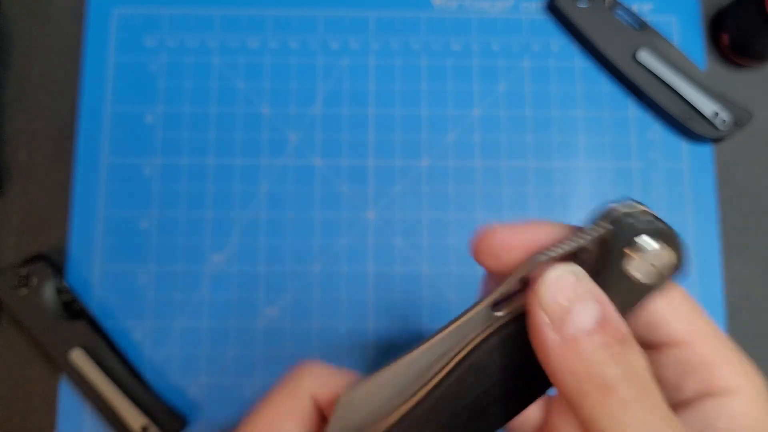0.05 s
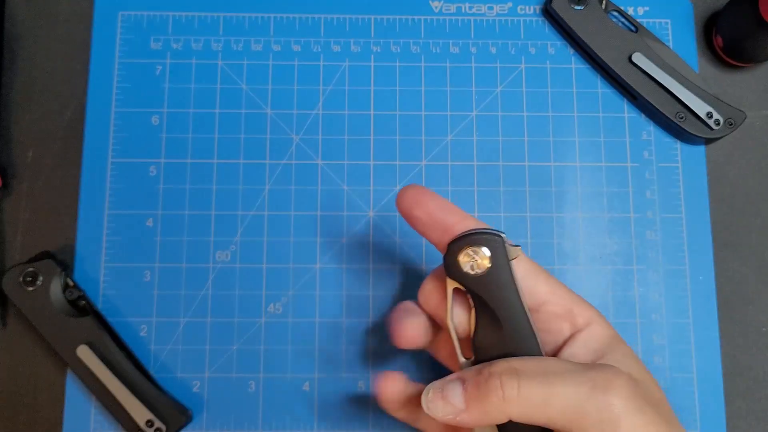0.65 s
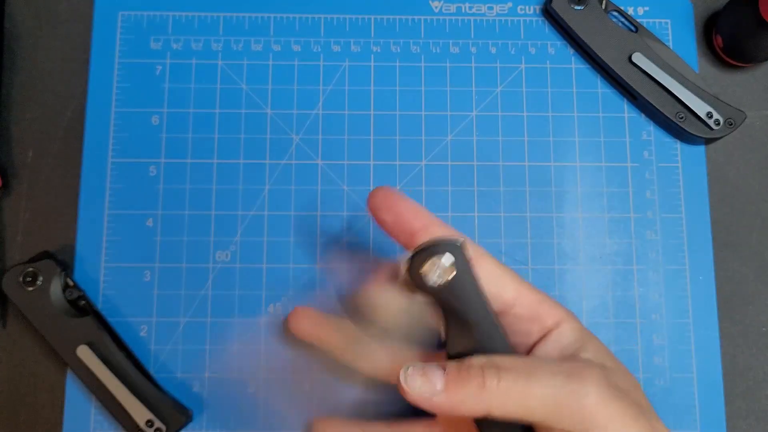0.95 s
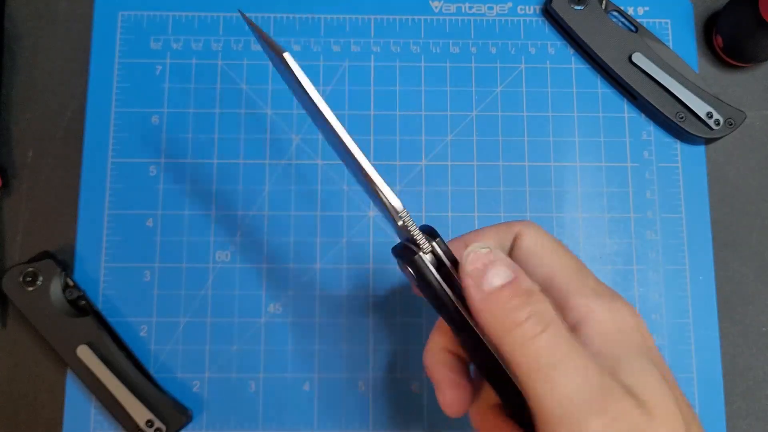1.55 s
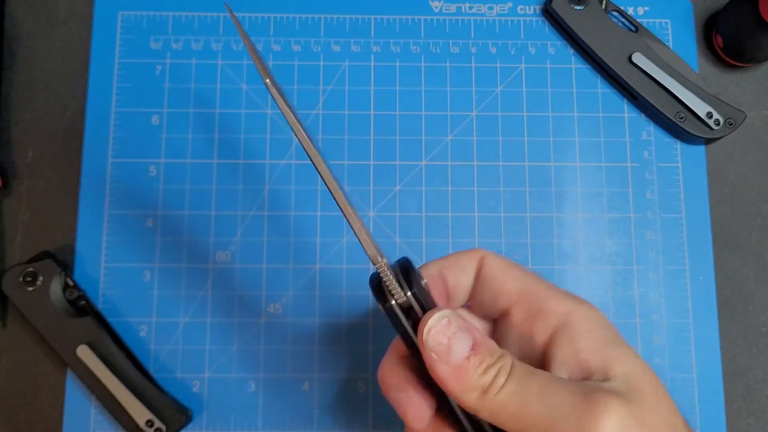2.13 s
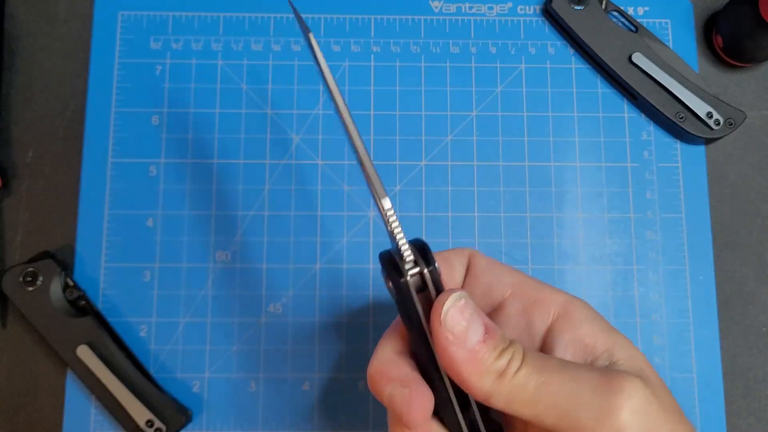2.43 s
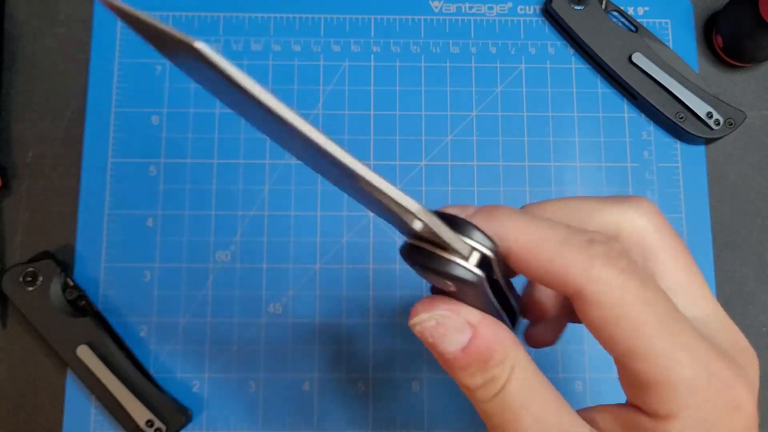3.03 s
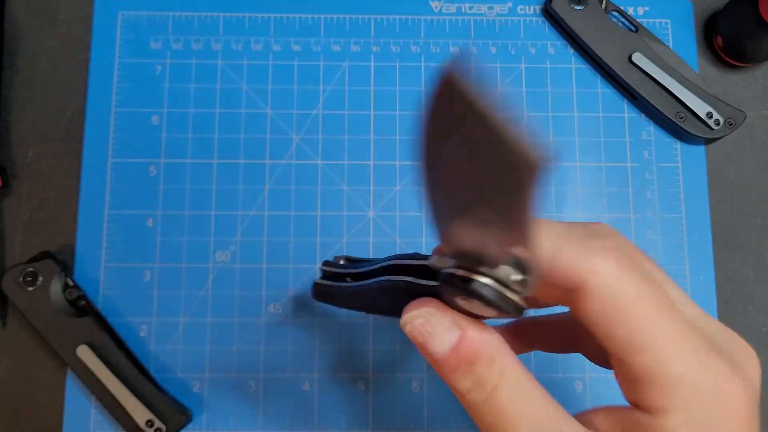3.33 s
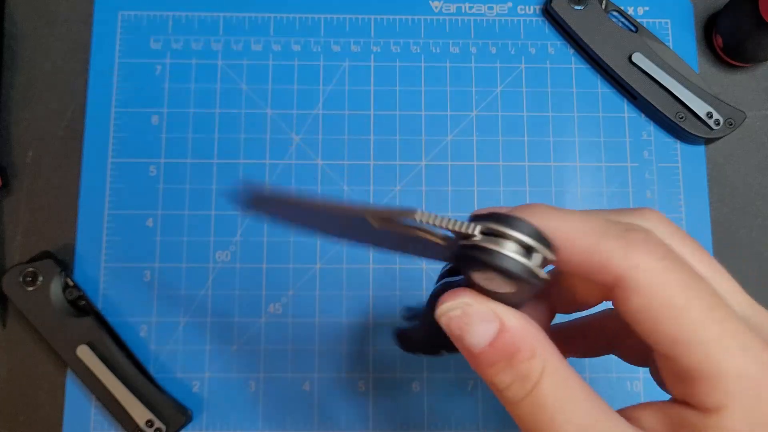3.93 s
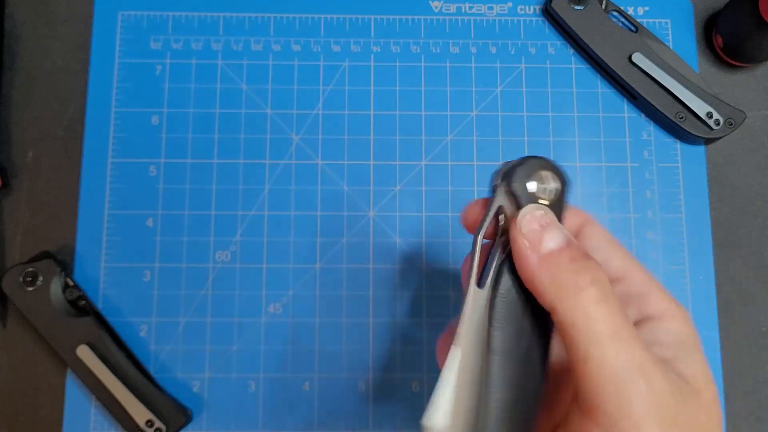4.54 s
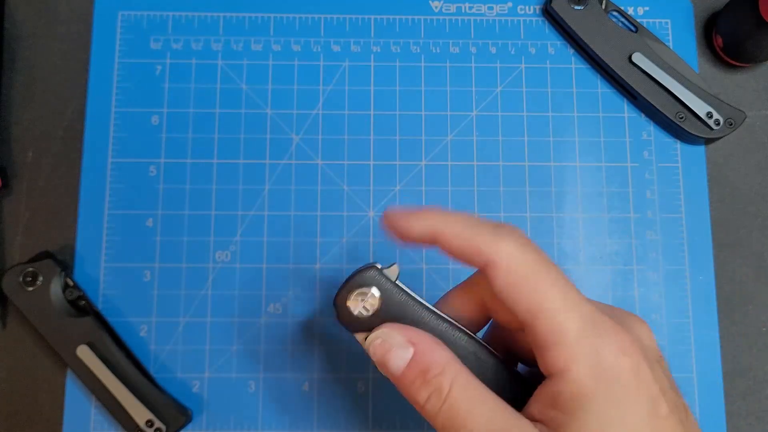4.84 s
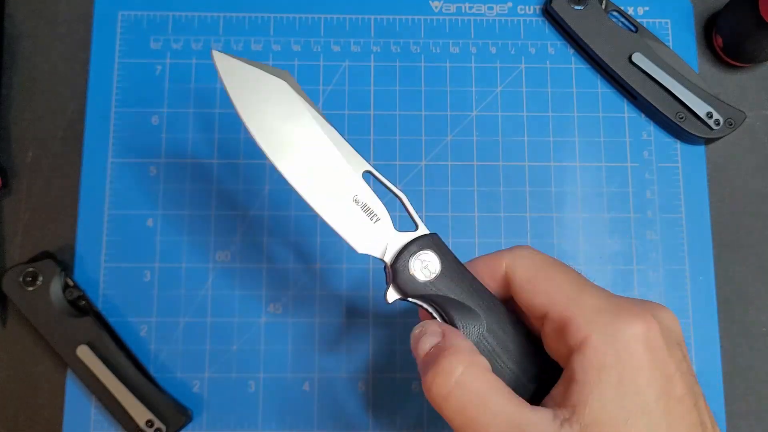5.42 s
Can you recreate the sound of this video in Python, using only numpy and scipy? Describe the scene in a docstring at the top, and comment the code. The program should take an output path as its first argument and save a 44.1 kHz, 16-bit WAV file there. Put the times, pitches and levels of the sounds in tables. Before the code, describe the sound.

A folding knife snaps open loudly, clicks and drops shut, then snaps open again over a faint fan hum.

```python
"""Fingers rub and squeak on a folding knife's handle, close up, over a fan in a small room.
The blade is flicked open, the lock thumbed aside, the blade drops shut and is flicked open again.
Each steel contact is a burst of chatter that sets the blade ringing; the handle knocks dully.
The two loud opening snaps each hold the gain down for a second."""
import sys
import numpy as np
from scipy import signal
from scipy.fft import rfft, irfft, next_fast_len
from scipy.io import wavfile
from scipy.ndimage import uniform_filter1d, minimum_filter1d

SR = 44100
rng = np.random.default_rng(int(sys.argv[2]) if len(sys.argv) > 2 else 0)


def store_pcm(level_fs):
    """Save levels as 16-bit WAV."""
    pcm = np.round(np.clip(level_fs, -1, 1) * 32767).astype(np.int16)
    wavfile.write(sys.argv[1], SR, np.atleast_2d(pcm).T)


N = 250293
N_FFT = next_fast_len(N, real=True)
TIME_S, FREQS_HZ = np.arange(N) / SR, np.fft.rfftfreq(N_FFT, 1 / SR)
CUTOFF_HZ = 16000


def from_db(db):
    """Decibels to gain."""
    return 10 ** (np.asarray(db) / 20)


def unit_rms(x):
    """Scale to rms 1."""
    return x / np.sqrt(np.mean(x ** 2) + 1e-30)


def at_hz(points, hz):
    """Interpolate a table over log frequency."""
    f, value = np.transpose(points)
    return np.interp(np.log(np.maximum(hz, 1)), np.log(f), value)


def panned(pan_db):
    """Stereo gains; pan is left minus right."""
    return from_db(np.array([[.5], [-.5]]) * pan_db)


def noise(colour):
    """Coloured noise, independent per channel, rms 1."""
    white = rfft(rng.standard_normal((2, N_FFT)))
    return unit_rms(irfft(white * from_db(at_hz(colour, FREQS_HZ)), N_FFT)[:, :N])


def jitter(samples):
    """Moving average of white noise, rms 1."""
    return unit_rms(uniform_filter1d(rng.standard_normal(N), size=samples))


def coloured(x, colour, taps=2048):
    """Minimum-phase filter of unit power."""
    hz = np.fft.rfftfreq(taps, 1 / SR)
    gain = from_db(at_hz(colour, hz)) / (1 + (hz / CUTOFF_HZ) ** 20)
    gain = gain * (hz + 1) / (hz + colour[0][0])   # a small body radiates little bass
    cepstrum = irfft(np.log(unit_rms(gain)))
    cepstrum[1:taps // 2] *= 2
    cepstrum[taps // 2 + 1:] = 0
    impulse = irfft(np.exp(rfft(cepstrum)))
    return signal.fftconvolve(x, impulse[None], axes=1)[:, :x.shape[1]]


def envelope(start_s, rise_s, hold_s, fall_s):
    """A movement speeds up, holds and slows to rest."""
    rise = np.clip((TIME_S - start_s) / rise_s, 0, 1)
    fall = np.clip((TIME_S - start_s - rise_s - hold_s) / fall_s, 0, 1)
    return np.sin(np.pi / 2 * rise) ** 2 * np.cos(np.pi / 2 * fall)


def add(out, sound, start_s):
    """Mix a sound in place."""
    start = int(round(start_s * SR))
    out[:, start:start + sound.shape[1]] += sound[:, :N - start]


# fan spectrum, low and high parts: f/Hz, relative level/dB
RUMBLE_COLOUR = [(20, -22), (40, -14.5), (57, 0.97), (75, -11.5), (97, -14), (138, 2.48), (180, -5),
                 (240, 2.97), (380, -4), (490, -2), (750, -10.5), (1300, -11.5), (2050, -20), (2450, -27)]
HISS_COLOUR = [(2450, -23.5), (3300, -35), (3850, -28), (4250, -23), (4750, -31), (7000, -34), (8500, -41),
               (15500, -42)]
# fan balance: f/Hz, pan/dB
FAN_PAN = [(50, -9), (130, -0.5), (250, -4), (1000, -4), (2200, -9), (3200, -9.5), (4300, -8),
           (7000, -12.5), (9000, -0.5), (16000, -0.5)]
# power common to both channels: f/Hz, share/0-1
FAN_COHERENCE = [(50, 0.99), (220, 0.91), (400, 0.49), (700, 0.56), (1200, 0.58), (1800, .35), (3000, 0.23),
                 (16000, 0.067)]
# motor tones: f/Hz, level/dB
MOTOR_WHINE = [(2003, -81.5), (2105, -83), (4107, -86), (4269, -84.5)]


def fan(rush_db=-55, lag_s=.00046, boom_hz=330, whine_pan_db=-6):
    """A fan on the right: its rush reaches the left late, while the room's boom stays in phase."""
    common = rfft(rng.standard_normal(N_FFT))
    separate = rfft(rng.standard_normal((2, N_FFT)))
    share = np.clip(at_hz(FAN_COHERENCE, FREQS_HZ), 0, 1)
    delay_s = np.array([[1], [0]]) * lag_s * np.clip(FREQS_HZ / boom_hz / 2 - .5, 0, 1)
    delayed = common * np.exp(-2j * np.pi * FREQS_HZ * delay_s)
    spectrum = np.sqrt(share) * delayed + np.sqrt(1 - share) * separate
    spectrum *= from_db(at_hz([*RUMBLE_COLOUR, *HISS_COLOUR], FREQS_HZ))
    spectrum *= panned(at_hz(FAN_PAN, FREQS_HZ))
    rush = unit_rms(irfft(spectrum, N_FFT)[:, :N])
    whine = sum(from_db(db) * np.sqrt(2) * np.sin(2 * np.pi * hz * TIME_S) for hz, db in MOTOR_WHINE)
    return from_db(rush_db) * rush + whine * panned(whine_pan_db)


# room decay: f/Hz, t60/s
TAIL_DECAY = [(300, .24), (1500, 0.19), (4000, .205), (6500, 0.23), (10000, .19), (16000, 0.15)]
# room spectrum: f/Hz, relative level/dB
TAIL_COLOUR = [(300, -4.5), (1500, 1.5), (4000, 0), (6500, 0), (10000, 4), (16000, 3.5)]


def room(x, onset_s=.003, build_s=.0038, late_db=-29.5, late_t60_s=.56, echo_db=-13):
    """Desk and walls return a dense tail; the far end of the room adds a faint, slower one."""
    t = np.arange(SR // 2) / SR
    hz = np.fft.rfftfreq(len(t), 1 / SR)
    spectrum = rfft(rng.standard_normal((2, len(t)))) * from_db(at_hz(TAIL_COLOUR, hz))
    late = from_db(late_db - 60 * t / late_t60_s)
    centres_hz, t60s_s = np.transpose(TAIL_DECAY)
    tail = 0
    for t60_s, weights in zip(t60s_s, np.eye(len(t60s_s))):
        band = at_hz(list(zip(centres_hz, weights)), hz)
        tail += irfft(spectrum * band, len(t)) * (from_db(-60 * t / t60_s) + late)
    tail *= np.clip((t - onset_s) / build_s, 0, 1)
    tail /= np.sqrt(np.sum(tail ** 2) / 2)
    for channel, echo_s in enumerate([.0115, .0088]):   # one wall echo a side
        tail[channel, int(echo_s * SR)] += from_db(echo_db)
    return signal.fftconvolve(x, tail, axes=1)[:, :N]


def friction(colour, grain_db, waver_db):
    """Sliding hiss: tiny catches under a wavering pressure."""
    catches, pressure = jitter(60), jitter(700)
    return noise(colour) * unit_rms(from_db(grain_db * catches + waver_db * pressure))


# finger strokes: t/s, rise/s, fall/s, level/dB
STROKES = [(0, 0.0033, 0.36, -61), (.305, 0.041, 0.092, -71), (0.444, 0.006, .08, -60), (.5, .03, .17, -77),
           (1.25, .04, .08, -67.5), (2.78, .08, .07, -79), (3.93, .045, .15, -73), (4.57, .075, .07, -74)]
# skin on the handle: f/Hz, relative level/dB
SKIN_COLOUR = [(1500, -2.5), (3000, -1), (5500, 3.5), (8000, -2), (12000, 0), (16000, 1)]


def fingers():
    """Fingers rub the handle as the grip shifts; the level follows their speed."""
    strokes = sum(from_db(db) * envelope(t_s, rise_s, 0, fall_s) for t_s, rise_s, fall_s, db in STROKES)
    return strokes * friction(SKIN_COLOUR, grain_db=2, waver_db=-2.1)


# skin squeaks: t/s, length/s, start f/Hz, glide/(Hz/s), level/dB
SKIN_SQUEAKS = [(0, 0.076, 13450, -9000, -71), (0.067, .12, 12600, -11000, -74),
                (.13, 0.073, 9560, -11000, -73), (0.136, 0.066, 7170, 9000, -68),
                (.32, .06, 14700, 10000, -74)]


def squeak(t_s, length_s, start_hz, glide_hz_per_s, db, waver_hz=90):
    """Skin sticks and slips on the handle: a thin, unsteady, gliding tone."""
    hz = start_hz + glide_hz_per_s * np.clip(TIME_S - t_s, 0, length_s) + waver_hz * jitter(60)
    swell = envelope(t_s, length_s / 2, 0, length_s / 2)
    return from_db(db) * swell * np.sin(2 * np.pi * np.cumsum(hz) / SR)


# pivot friction: f/Hz, relative level/dB
PIVOT_COLOUR = [(1500, -17), (3000, -10), (4800, 1), (7500, -9), (12500, -9.5), (16000, -7)]


def pivot(flicks, spin_up_s=.048, stop_s=.003):
    """The blade spins up on its pivot and coasts until the slam stops it."""
    swings = sum(from_db(db) * envelope(slam_s - swing_s, spin_up_s, swing_s - spin_up_s, stop_s)
                 for slam_s, *_, swing_s, db in flicks)
    return swings * friction(PIVOT_COLOUR, grain_db=-1.1, waver_db=-2.5)


# air on the microphone: f/Hz, relative level/dB
AIR_COLOUR = [(20, -9.5), (55, 6), (110, -5), (220, -10.5), (500, -20)]


def air_puff(t_s, left_db=-24.5, right_db=-42.5):
    """Air pushed by the swing reaches the microphone as the blade stops."""
    gust = envelope(t_s, rise_s=.0023, hold_s=.015, fall_s=.009)
    return from_db([[left_db], [right_db]]) * gust * noise(AIR_COLOUR)


# handle and lock bar knocks, and one room boom: t/s, f/Hz, level/dB, t60/s
KNOCKS_AND_BOOM = [(1.0054, 1350, -41, 0.092), (1.038, 302, -33, 0.071), (1.052, 136.1, -33.5, 0.2),
                   (2.3274, 3490, -50, 0.027), (2.3263, 5200, -50.5, .018), (4.1045, 620, -46, .02),
                   (4.1062, 1690, -44, 0.041), (4.1056, 4880, -48, .03), (5.1836, 1500, -29, 0.034)]


def knocks_and_boom():
    """Short, hand-damped knocks of handle and lock bar, and a low room boom after the first snap."""
    out, t = np.zeros((2, N)), np.arange(SR // 4) / SR
    for t_s, hz, db, t60_s in KNOCKS_AND_BOOM:
        mode = from_db(db - 60 * t / t60_s) * np.sin(2 * np.pi * hz * t)
        add(out, mode[None], t_s)
    return out


# steel blade and liner modes: f/Hz, relative level/dB, t60/s at grip 1
BLADE_MODES = [(1590, -9, .15), (2195, -9, 0.17), (3650, -15, .15), (4072, -8, .18), (4262, 2.5, 0.34),
               (4377, -2.5, .24), (5025, -4, .18), (5324, -1, 0.3), (5321, 2, 0.28), (5603, -0.5, .2),
               (6340, -1, 0.15), (6500, 2.5, .21), (6500, -1, 0.11), (6647, 1, .19), (7112, -1, 0.43),
               (7760, -3, 0.3), (10100, -6.5, .15), (10464, -5.5, .15), (11850, -7, .14),
               (11400, -3.5, .14), (13790, -7.5, .13), (14750, -7.5, .14)]


def blade_ring(t, grip, spread_db=2.5):
    """A blow excites each mode with random strength and phase; grip multiplies the decay rate."""
    hz, db, t60_s = np.transpose(BLADE_MODES)
    strength = from_db(db + spread_db * rng.standard_normal((2, len(hz))))
    strength /= np.sqrt(np.sum(strength ** 2) / 4)
    phase = np.exp(2j * np.pi * rng.random(strength.shape))
    poles = 2j * np.pi * hz - np.log(1000) * grip / t60_s
    return np.real((strength * phase) @ np.exp(np.outer(poles, t)))


def contacts(rows, colour, rise_s, grip, send_db, common_share=.25, ring_send_db=-8.5):
    """Steel chatters on steel for milliseconds, then the blade rings on. Returns (direct, room send)."""
    clack, ring, t = np.zeros((2, N)), np.zeros((2, N)), TIME_S[:SR // 4]
    for t_s, db, pan_db, decay_s, ring_db in rows:
        onset = from_db(db) * panned(pan_db) * np.minimum(t / rise_s, 1)
        decay = np.exp(-np.maximum(t - rise_s, 0) / decay_s)
        chatter = rng.choice([-1, 1], (2, len(t)))
        chatter[1] = np.where(rng.random(len(t)) < common_share, chatter[0], chatter[1])
        add(clack, coloured(chatter * onset * decay, colour), t_s)
        add(ring, from_db(ring_db) * onset * blade_ring(t, grip), t_s)
    radiated = clack + from_db(ring_send_db) * ring   # the thin blade radiates less than the whole knife
    return np.array([clack + ring, from_db(send_db) * radiated])


# detent contacts: t/s, level/dB, pan/dB, decay/s, ring/dB re level
DETENT_HITS = [(.9718, -62.5, -4.5, 0.00067, -35), (1.0062, -37, 6, .0025, -32)]
# detent spectrum: f/Hz, relative level/dB
BALL_COLOUR = [(700, -17.5), (1300, 1), (2300, -7.5), (4300, 4), (7000, -14), (11000, -17), (14500, -1),
               (16000, -3.5)]


def detent():
    """The detent ball lets go of the blade."""
    return contacts(DETENT_HITS, BALL_COLOUR, rise_s=.00027, grip=1.8, send_db=-3.5)


# lock bar contact: t/s, level/dB, pan/dB, decay/s, ring/dB re level
UNLOCK_HITS = [(2.3270, -35.5, -3.5, 0.0011, -21)]
# lock bar spectrum: f/Hz, relative level/dB
LOCK_BAR_COLOUR = [(700, -3), (1600, -1), (2700, -10), (3450, 9.5), (4200, 0), (5300, 4), (6200, -9),
                   (7800, 4.5), (9500, -8.5), (12300, -1), (16000, -13)]


def unlock():
    """The thumb pushes the lock bar aside with a click."""
    return contacts(UNLOCK_HITS, LOCK_BAR_COLOUR, rise_s=.00074, grip=2.2, send_db=-5)


# closing contacts: t/s, level/dB, pan/dB, decay/s, ring/dB re level
CLOSING_HITS = [(4.1043, -34, 7, 0.00077, -29), (4.1056, -36, -4, 0.0024, -13.5),
                (4.1150, -39, 0, 0.0054, -8)]
# closing spectrum: f/Hz, relative level/dB
CLOSING_COLOUR = [(250, 3), (600, 8), (1200, 2), (1800, 1), (3100, -9.5), (4000, -3.5), (4750, 6.5),
                  (6000, -8), (8000, -14), (9600, -1), (10600, -12), (12400, -2), (16000, -14)]


def drop_shut():
    """The blade drops into the handle and bounces."""
    return contacts(CLOSING_HITS, CLOSING_COLOUR, rise_s=.00035, grip=3, send_db=-7.5)


# openings: slam t/s, level/dB, pan/dB, ring/dB re level, rebound/dB re level, swing/s, swing level/dB
FLICKS = [(1.0450, -6.5, -1, -20, -7.5, 0.074, -52), (5.1835, -7.5, -0.5, -18.5, -17, 0.072, -51.5)]
# one spectrum per opening, set by the grip: f/Hz, relative level/dB
FLICK_COLOURS = [
    [(280, -9.5), (750, -12.5), (1000, -15.5), (1500, -6), (2100, -8.5), (3600, -9), (4300, 2.5),
     (5300, -1), (5950, -3), (6550, 4.5), (7200, -1.5), (8000, -11.5), (12200, -9.5), (16000, -9.5)],
    [(500, -17), (1000, -11.5), (1550, -2), (2000, -4.5), (2950, -9.5), (3750, -2), (4600, -1), (5350, 5.5),
     (5950, -3), (6600, 4), (8400, -7.5), (10800, -8), (12200, -7), (16000, -7.5)],
]


def snap_open(lock_lead_s=.0053, rebound_lag_s=.0082):
    """The lock bar slips in behind the blade, which slams on its stop pin and rebounds."""
    out = 0
    for (t_s, db, pan_db, ring_db, rebound_db, *_), colour in zip(FLICKS, FLICK_COLOURS):
        # t/s, level/dB, pan/dB, decay/s, ring/dB re level
        lock = (t_s - lock_lead_s, db - 12.5, pan_db + 5.5, .0012, -28.5)
        slam = (t_s, db, pan_db, .003, ring_db)
        rebound = (t_s + rebound_lag_s, db + rebound_db, pan_db - 1.5, .003, -18)
        out += contacts([lock, slam, rebound], colour, rise_s=.00093, grip=1.3, send_db=-.53)
    return out


# balance of the direct contacts: f/Hz, pan/dB
DIRECT_PAN = [(1500, 0.5), (6500, -4), (11000, 5.5), (16000, 4.5)]


def mic_facing(x):
    """The left microphone port faces the pivot and gets more of its top treble."""
    return irfft(rfft(x, N_FFT) * panned(at_hz(DIRECT_PAN, FREQS_HZ)), N_FFT)[:, :N]


def scene():
    """Knife and hand in the room, over the fan."""
    direct, send = snap_open() + detent() + unlock() + drop_shut()
    handling = pivot(FLICKS) + fingers() + sum(squeak(*row) for row in SKIN_SQUEAKS)
    soft_sounds = handling + knocks_and_boom()
    reverb = room(send + from_db(-7) * soft_sounds)
    first_slam_s = FLICKS[0][0]
    return mic_facing(direct) + soft_sounds + reverb + air_puff(first_slam_s) + fan()


def record(dry, threshold_db=-30, cut_db_per_db=.19, attack_s=.00033, hold_s=1.0, release_db_per_s=7):
    """Gain control ducks on loud snaps, holds and recovers; a steep low-pass follows."""
    power = np.abs(uniform_filter1d(np.mean(dry ** 2, axis=0), size=64))
    level_db = 10 * np.log10(power + 1e-12)
    cut_db = cut_db_per_db * np.maximum(level_db - threshold_db, 0)
    half_hold = int(hold_s * SR / 2)
    held_db = -minimum_filter1d(-cut_db, size=2 * half_hold + 1, origin=half_hold, mode="constant")
    ramp_db = release_db_per_s * TIME_S
    released_db = np.maximum.accumulate(held_db + ramp_db) - ramp_db
    pole = np.exp(-1 / (attack_s * SR))
    gain = from_db(-signal.lfilter([1 - pole], [1, -pole], released_db))
    lowpass = signal.ellip(10, .1, 70, CUTOFF_HZ, fs=SR, output="sos")
    return signal.sosfilt(lowpass, dry * gain)


dry = scene()
out = record(dry)
store_pcm(out)
```